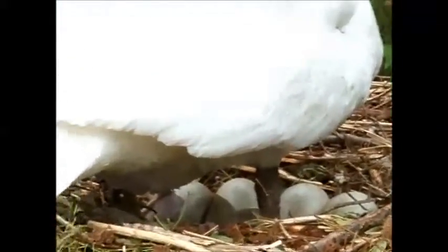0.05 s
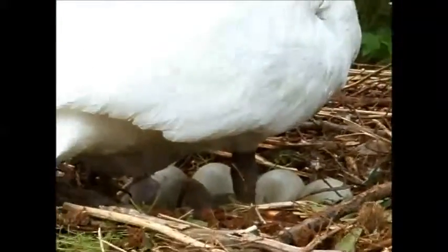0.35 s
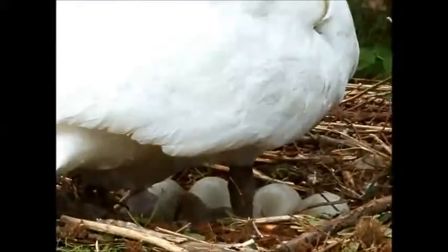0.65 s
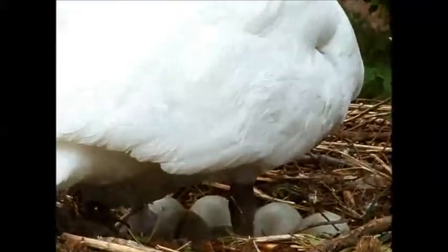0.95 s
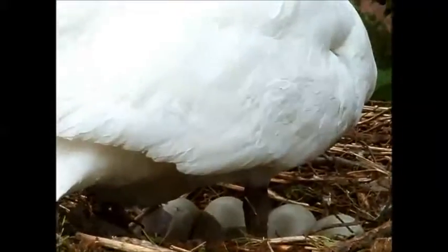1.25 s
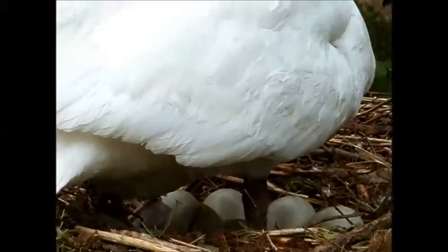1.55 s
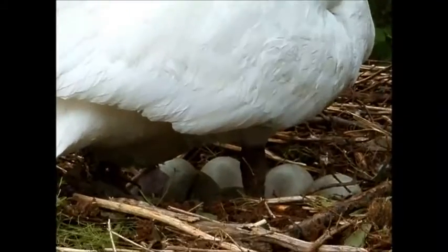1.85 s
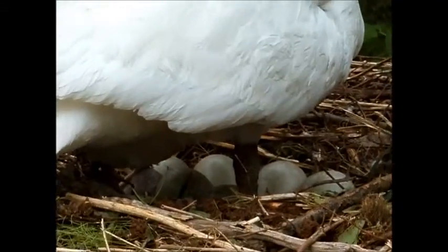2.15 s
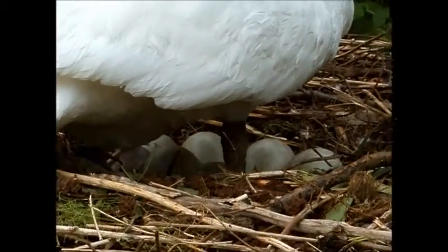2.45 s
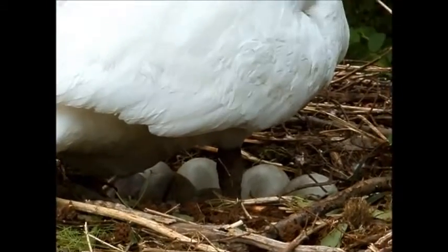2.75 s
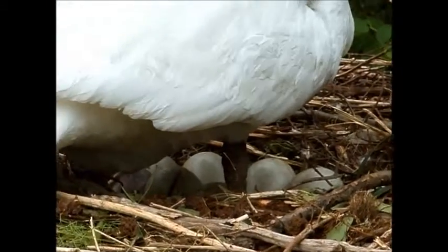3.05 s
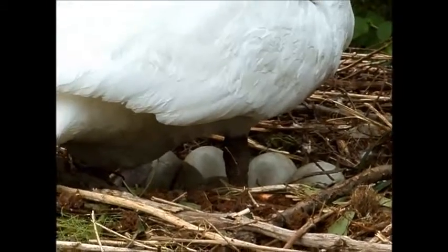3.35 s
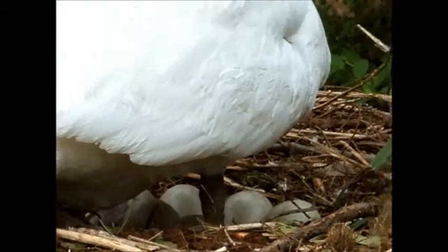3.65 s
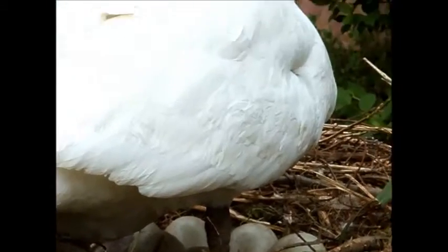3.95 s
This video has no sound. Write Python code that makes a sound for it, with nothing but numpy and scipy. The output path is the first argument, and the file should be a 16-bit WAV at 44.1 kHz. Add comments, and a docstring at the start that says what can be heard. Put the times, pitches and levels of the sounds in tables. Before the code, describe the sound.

Raspy sparrow chirps repeat over rustling leaves and puffs of wind.

```python
"""Sparrow on a breezy day

A sparrow chirps about twice a second in two raspy voices, smeared by echoes off nearby surfaces.
Farther off, one bird whistles and another gives a thin falling note. A hollow knock rings at the start,
and a few faint taps come early and late. Puffs of wind bump the microphone over a steady rush of
leaves and air and a distant drone. The sound is mono."""
import sys
import numpy as np
from scipy import signal
from scipy.fft import rfft, irfft, next_fast_len
from scipy.io import wavfile
from scipy.ndimage import map_coordinates

SR = 44100
rng = np.random.default_rng(int(sys.argv[2]) if len(sys.argv) > 2 else 0)


def bounce(signal):
    """Save signal as a 16-bit WAV file at the path given by the first command-line argument."""
    frames = np.transpose(np.atleast_2d(signal))
    limited = np.clip(frames, -1, 1)
    pcm = np.round(limited * 32767).astype(np.int16)
    wavfile.write(sys.argv[1], SR, pcm)


N = 176400


def amp(db):
    return 10 ** (np.asarray(db) / 20)


def unit(x):
    return x / np.sqrt(np.mean(x ** 2) + 1e-20)


def wobble(rate, size):
    """A smooth random curve, rate knots a second."""
    return map_coordinates(rng.standard_normal(4000), [np.arange(size) * rate / SR], mode="wrap")


def curve(rows):
    """An automation lane: one value per sample from (seconds, value) rows."""
    return np.interp(np.arange(N) / SR, *np.transpose(rows))


def filtered(x, response):
    """x through an EQ whose gain is a function of frequency."""
    size = next_fast_len(N + SR // 2)
    return irfft(rfft(x, size) * response(np.fft.rfftfreq(size, 1 / SR)), size)[:N]


def noise(points):
    """Noise of rms 1, coloured by (Hz, dB) points."""
    point_hz, db = np.transpose(points)
    colour = lambda hz: amp(np.interp(np.log(hz + 1), np.log(point_hz), db))
    return unit(filtered(rng.standard_normal(N), colour))


def noise_band(centre_hz, width_hz, db):
    """A narrow, almost pitched band of noise."""
    peak = lambda hz: 1 / (1 + ((hz - centre_hz) / width_hz * 2) ** 2) ** 0.95
    return amp(db) * unit(filtered(rng.standard_normal(N), peak))


def add(out, start_s, x):
    """Mix x into out from start_s on."""
    i = round(start_s * SR) + np.arange(len(x))
    inside = (i >= 0) & (i < N)
    out[i[inside]] += x[inside]


def reverb(x, t60):
    """The diffuse outdoor tail of x, falling 60 dB in t60 seconds."""
    t = np.arange(SR // 2) / SR
    response = rng.standard_normal(len(t)) * amp(-60 * t / t60) * (1 - np.exp(-t / .006))
    return signal.fftconvolve(x, response / np.linalg.norm(response))[:N]


def bird_note(rows, waver, ratio=1):
    """A fluttering sine along (seconds, Hz, dB[, rasp]) rows; waver is a share of the pitch."""
    flutter_hz, flutter_db, fade_s = 331.6, 2.5, .006
    rasp_hz, rasp_depth = 430, .11  # rasp is a fast trill of the pitch
    times, hz, db, *rasp = np.transpose(rows)
    t = np.arange(times[0], times[-1], 1 / SR)
    bend = waver * wobble(flutter_hz, len(t))
    if rasp:
        trill_hz = rasp_hz * (1 + .3 * wobble(flutter_hz, len(t)))
        trill = np.sin(2 * np.pi * np.cumsum(trill_hz) / SR)
        bend += rasp_depth * np.interp(t, times, np.clip(rasp[0], 0, 1)) * trill
    pitch = ratio * np.interp(t, times, hz) * (1 + bend)
    level = amp(np.interp(t, times, db) + flutter_db * wobble(flutter_hz, len(t)))
    fade = np.clip(np.minimum(t - times[0], times[-1] - t) / fade_s, 0, 1)
    return np.sqrt(2) * fade * level * np.sin(2 * np.pi * np.cumsum(pitch) / SR)


def outdoor_bed():
    """A steady rush of leaves and air, with a distant drone and a thin band of hiss."""
    # Colour of the rush. Each row: frequency in Hz, relative level in dB.
    rush_colour = [(20, -8.5), (45, -14.5), (85, -14.5), (125, -9.5), (175, -8), (240, -5.5), (330, -6),
                   (480, -5.5), (900, -6.5), (1500, -10), (2100, -10.5), (3700, -17), (7000, -17.5),
                   (8100, -27.5)]
    # Slow drift of the rush. Each row: time in seconds, level in dB before the lift.
    rush_drift = [(0.0, -49), (0.42, -48), (0.9, -47.5), (1.14, -48.5), (3.51, -47.5), (4.0, -48)]
    # The drone's two bands. Each row: centre in Hz, width in Hz, level in dB.
    drone_bands = [(132.1, 6.8, -56.5), (227.7, 14, -60.5)]
    lift_db, flicker_db = 3, .47
    rush = amp(curve(rush_drift) + lift_db + flicker_db * wobble(8, N)) * noise(rush_colour)
    drone = sum(noise_band(*band) for band in drone_bands)
    return rush + drone + noise_band(centre_hz=7850, width_hz=150, db=-68)


def wind():
    """Brief eddies thump the microphone over a lumpy rumble; it sheds their lowest bass."""
    # Colour of rumble and puffs. Each row: frequency in Hz, relative level in dB.
    colour = [(25, -37), (55, 2.5), (90, 2), (160, 3), (270, -4), (400, -17.5), (700, -31.5), (1500, -48),
              (4000, -65.5)]
    # The rumble between puffs. Each row: time in seconds, level in dB before the low cut.
    breeze = [(0, -47), (.3, -48.5), (.65, -44.5), (.82, -51.5), (1.05, -42.5), (1.22, -46), (1.26, -45.5),
              (1.4, -49), (1.5, -49), (1.8, -46.5), (1.93, -49.5), (2.2, -43), (2.35, -51), (2.9, -52.5),
              (3.03, -45), (3.18, -55), (4, -57.5)]
    # The puffs. Each row: centre in seconds, level in dB before the low cut, width in seconds.
    puffs = [(.262, -40, 0.0095), (0.428, -34.5, 0.0096), (.555, -39.5, 0.024), (0.586, -32, 0.0057),
             (.61, -37.5, 0.013), (.7, -41.5, 0.011), (0.906, -41, 0.01), (0.963, -35, .01),
             (.993, -17.5, 0.0023), (1.017, -26, 0.0087), (1.059, -23, 0.0058), (1.075, -23, 0.0024),
             (1.091, -28, 0.0039), (1.133, -32.5, 0.0049), (1.171, -29.5, 0.0072), (1.201, -27, 0.0054),
             (1.457, -34, 0.021), (1.495, -31, 0.0035), (1.516, -33, 0.01), (1.56, -37.5, 0.017),
             (1.6, -33, 0.011), (1.631, -27, 0.0083), (1.702, -30.5, 0.0064), (1.719, -36.5, 0.0065),
             (1.778, -28.5, 0.0075), (1.801, -28.5, 0.0042), (1.813, -21, 0.0043), (1.832, -33.5, 0.0029),
             (1.885, -37.5, .006), (1.986, -38, 0.011), (2.051, -40.5, 0.018), (2.161, -36.5, 0.0072),
             (2.185, -20.5, 0.002), (2.204, -31.5, 0.0056), (2.227, -38, 0.0078), (2.278, -37, 0.0035),
             (3.011, -46.5, 0.044), (3.097, -36.5, 0.0078)]
    lump_db, low_cut_hz = 4.1, 76
    out = amp(curve(breeze)) * unit(noise(colour) * amp(lump_db * wobble(35, N)))
    eddies, t = noise(colour), np.arange(N) / SR
    for centre, db, width in puffs:
        near = np.abs(t - centre) < 4 * width
        swell = np.exp(-.5 * ((t[near] - centre) / width) ** 2)
        puff = swell * eddies[near]
        out[near] += amp(db) * puff * np.linalg.norm(swell) / np.linalg.norm(puff)
    return filtered(out, lambda hz: (hz / low_cut_hz) ** 3 / np.sqrt(1 + (hz / low_cut_hz) ** 6))


def faint_taps():
    """Dull taps, each one damped sine with a soft attack."""
    # The taps. Each row: start in seconds, level in dB, pitch in Hz.
    hits = [(0.336, -43, 1032), (.345, -38.5, 410), (3.536, -42, 405), (3.55, -48, 589)]
    attack_s, t60 = .0022, .19
    out, t = np.zeros(N), np.arange(SR // 5) / SR
    for start, db, hz in hits:
        envelope = amp(db - 60 * t / t60) * (1 - np.exp(-t / attack_s))
        add(out, start, envelope * np.sin(2 * np.pi * hz * t))
    return out


def far_birds():
    """Slow whistles and one thin falling note, softened by distance."""
    # Path of the thin note. Each row: time in seconds, pitch in Hz, level in dB.
    thin_note = [(3.15, 7990, -61), (3.2, 7690, -55), (3.25, 7550, -58), (3.33, 7380, -58),
                 (3.375, 7330, -49), (3.43, 7150, -55.5), (3.45, 7350, -66), (3.52, 7180, -58.5)]
    # One path per whistle. Each row: time in seconds, pitch in Hz, level in dB before the trim.
    whistles = [
        [(1.82, 1846, -66), (1.91, 2178, -55), (2.08, 2450, -58.5), (2.28, 2484, -55), (2.37, 2510, -56),
         (2.49, 2535, -57), (2.6, 2400, -71)],
        [(2.39, 2130, -49), (2.46, 2090, -53), (2.54, 2035, -52), (2.63, 2000, -51.5), (2.68, 2070, -54.5),
         (2.76, 2100, -58), (2.83, 2000, -51)],
    ]
    trim_db, reverb_db = -1.5, -14.5
    direct = np.zeros(N)
    add(direct, thin_note[0][0], bird_note(thin_note, waver=.0022))
    for path in whistles:
        add(direct, path[0][0], amp(trim_db) * bird_note(path, waver=.028))
    return direct + amp(reverb_db) * reverb(direct, t60=.59)


def knock():
    """A short crack sets a hollow body ringing."""
    # The body's modes. Each row: frequency in Hz, relative level in dB, seconds to fall 60 dB.
    modes = [(619, -5.5, 0.067), (863, 3, 0.039), (1027, 8.5, 0.021), (1206, 0, 0.032), (1615, -0.5, 0.055),
             (1820, -4, 0.044), (2070, -15, 0.047)]
    # Colour of the crack. Each row: frequency in Hz, relative level in dB.
    crack_colour = [(200, -3.5), (1100, 0), (1900, -3), (3200, -27), (4600, -18), (6000, -34)]
    start_s, attack_s, crack_t60 = .0443, .0002, .01
    ring_db, crack_db = -26, -20
    out, t = np.zeros(N), np.arange(SR // 5) / SR
    ring = sum(amp(db - 60 * t / t60) * np.sin(2 * np.pi * (hz * t + rng.random()))
               for hz, db, t60 in modes)
    crack = noise(crack_colour)[:len(t)] * amp(-60 * t / crack_t60)
    attack = 1 - np.exp(-t / attack_s)
    add(out, start_s, (amp(ring_db) * ring + amp(crack_db) * crack) * attack)
    return out


def sparrow():
    """Chirps from both sides of the syrinx, with early echoes and a short tail."""
    # Four named chirp shapes, stretched and tuned for each chirp.
    # Each row: seconds into the shape, base pitch in Hz, relative level in dB, rasp from 0 to 1.
    shapes = { "dipping": [(0, 4374, -17, .2), (.012, 3935, -12, 0), (.022, 4013, -14.5, 0),
              (.027, 4380, -6, 0.8), (.033, 3540, -13, .3), (.043, 3160, -7.5, 0), (.05, 3647, -12, .6),
              (.058, 4600, -4.5, .8), (.063, 4820, -16, .8), (.067, 2762, -14, .6),
              (.074, 3150, -2.5, 0.14), (.083, 3106, -4.5, .05), (.095, 2390, -11, .5)],
              "falling": [(0, 3655, -4, .3), (.01, 4230, -8.5, 0.5), (.02, 4600, -0.5, .3),
              (.028, 3810, -3, 0.1), (.038, 4460, -10, 1), (.047, 3650, -8.5, .5), (.058, 3650, -11, 0.6),
              (.068, 3230, -9, .8), (.08, 3056, -6, .6), (.09, 3090, -10.5, 0.1), (.102, 2330, -12, .3)],
              "arched": [(0, 4100, -10, 0.2), (.008, 4485, -2, .7), (.015, 4950, -4, .7),
              (.025, 5630, -12, 1), (.032, 5000, -9, .4), (.04, 4400, -0.5, .1), (.049, 4200, -7, 0.2),
              (.057, 4500, -14, .9), (.073, 4400, -10.5, .8), (.083, 3650, -10.5, 0),
              (.095, 3650, -10.5, 0.1), (.107, 4410, -10, .8), (.125, 3430, -17, 0.5)],
              "split": [(0, 5100, -18, 0), (.008, 4570, -13, 0.7), (.012, 3940, -5, .45),
              (.023, 4080, -6, 0.7), (.03, 4350, 1.5, 0), (.036, 4040, -1, .5), (.042, 4270, -17, .4),
              (.047, 3930, -4, .7), (.056, 3950, -15, 0.47), (.061, 3050, -3.5, 0), (.072, 3130, -3, 0),
              (.08, 3670, -16, .2), (.094, 3030, -21, .1), (.109, 2430, -9, 0.1)], }
    # The chirps. Each row: start in seconds, gain in dB, length factor, pitch factor, shape name.
    chirps = [(-.1, -35.5, 1.04, 1, "arched"), (.378, -36.5, 0.99, 0.96, "dipping"),
              (.852, -34.5, .99, 1.001, "falling"), (1.312, -35.5, 1.02, 1.003, "arched"),
              (1.857, -32.5, 0.97, 1.004, "dipping"), (2.301, -36, .99, .99, "arched"),
              (2.963, -35.5, 1.01, .999, "split"), (3.528, -42.5, 1.03, 1.045, "arched")]
    # Echoes off nearby surfaces. Each row: delay in seconds, gain in dB.
    echoes = [(.0075, -17), (0.012, -19.5), (0.026, -16)]
    second_ratio, second_db = 1.2, -13.5  # the other side of the syrinx
    octave_db, reverb_db = -28, -7.5
    direct = np.zeros(N)
    for start, db, length, pitch, shape in chirps:
        path = np.array(shapes[shape]) * [length, pitch, 1, 1]
        for ratio, voice_db in [(1, 0), (second_ratio, second_db), (2, octave_db)]:
            add(direct, start, amp(db + voice_db) * bird_note(path, waver=.03, ratio=ratio))
    out = direct + amp(reverb_db) * reverb(direct, t60=.24)
    for delay, db in echoes:
        add(out, delay, amp(db) * direct)
    return out


def scene():
    """All layers in mono, the same on both channels."""
    mono = sparrow() + far_birds() + knock() + faint_taps() + wind() + outdoor_bed()
    return np.array([mono, mono])


def record(dry):
    """A brick-wall high cut takes the top off the whole mix."""
    high_cut_hz = 8080
    high_cut = lambda hz: 1 / np.sqrt(1 + (hz / high_cut_hz) ** 200)
    return np.array([filtered(channel, high_cut) for channel in dry])


dry = scene()
out = record(dry)
bounce(out)
```